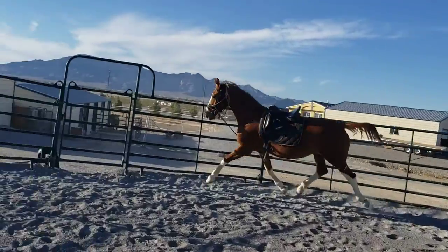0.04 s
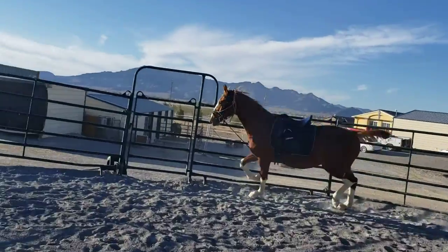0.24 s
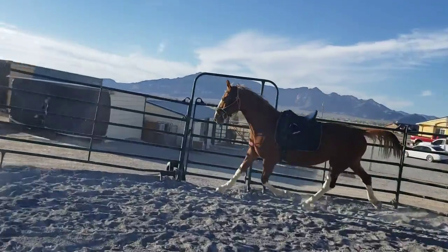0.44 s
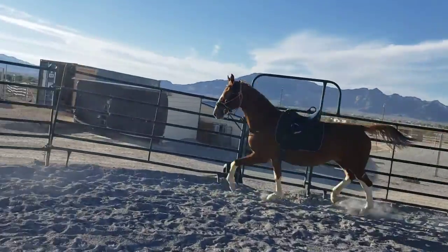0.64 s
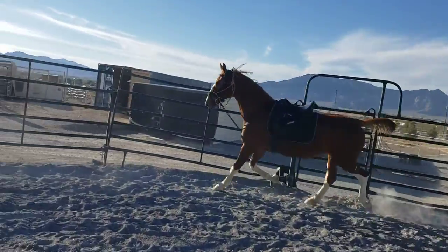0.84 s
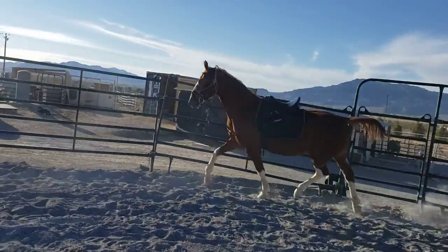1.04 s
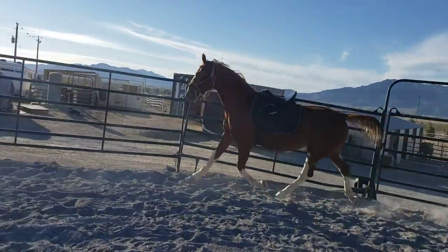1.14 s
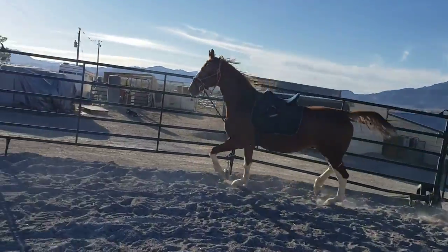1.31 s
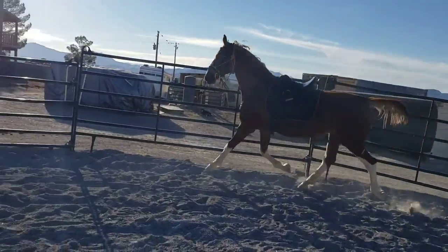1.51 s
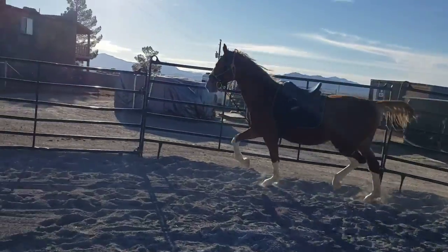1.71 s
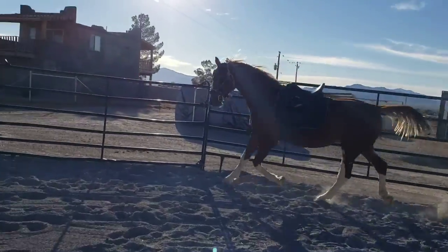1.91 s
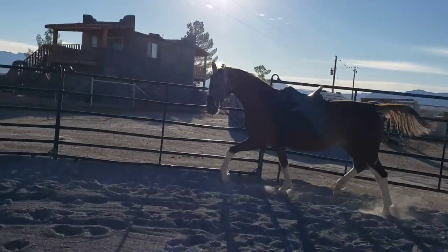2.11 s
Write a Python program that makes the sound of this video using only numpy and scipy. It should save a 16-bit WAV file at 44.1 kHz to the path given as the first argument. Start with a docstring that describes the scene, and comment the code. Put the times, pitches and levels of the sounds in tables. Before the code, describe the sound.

A trotting horse's muffled footfalls crunch and spray sand while low wind thumps the microphone

```python
"""A horse trots round a pen on deep sand, some metres from a phone held in a light breeze; about 2 s.
Air hiss and low wind run throughout: eddies thump on each of the two microphone ports separately.
Small dull knocks of hooves and saddle gear come at once, with footfalls crunching as coarse grains grind.
From 0.2 s a gust flutters on the left port as fine sand starts to spray, in ringing showers of grains.
Low thuds on firmer ground join from 0.6 s, and a buckle ticks once near 1.5 s."""
import sys
import numpy as np
from scipy import signal
from scipy.fft import rfft, irfft
from scipy.io import wavfile
from scipy.ndimage import uniform_filter1d

SR = 44100
rng = np.random.default_rng(int(sys.argv[2]) if len(sys.argv) > 2 else 0)


def voltage_ratio(decibels):
    """Convert decibels (scalar or array-like) to amplitude ratios, 20 dB per decade."""
    exponent = np.asarray(decibels, float) / 20
    return 10 ** exponent


def output_pcm(signal):
    """Save a mono or channel-first signal as 16-bit PCM at the path in sys.argv[1].

    Samples are clipped to [-1, 1] before scaling.
    """
    pcm = np.clip(np.atleast_2d(signal).T, -1, 1) * 32767
    wavfile.write(sys.argv[1], SR, np.round(pcm).astype(np.int16))


N = 94815
T = np.arange(N) / SR


def colour(x, table, scale=1):
    """Filters by a (freq_hz, gain_db) curve, straight in log frequency; scale multiplies the dB."""
    freq_hz, gain_db = np.array(table, float).T
    f = np.maximum(np.arange(N // 2 + 1) * SR / N, 1)
    curve_db = np.interp(np.log(f), np.log(freq_hz), gain_db)
    return irfft(rfft(x) * voltage_ratio(scale * curve_db), N)


def unit(x):
    """Scales to rms 1."""
    return x / np.sqrt(np.mean(x ** 2))


def walk(rate):
    """Random levels held 1 / rate seconds, slewed twice into a smooth wander."""
    hold = int(SR / rate)
    steps = np.repeat(rng.standard_normal(N // hold + 1), hold)
    return 1.36 * uniform_filter1d(uniform_filter1d(steps, hold), hold)[:N]


def sides(table):
    """Gains of left and right along a (time_s, left_minus_right_db) curve."""
    pan_db = np.interp(T, *np.array(table, float).T)
    return voltage_ratio(np.array([pan_db, -pan_db]) / 2)


def fall(t, t60):
    """Exponential decay after t = 0, losing 60 dB in t60 seconds."""
    return np.exp(-np.log(1000) * np.maximum(t, 0) / t60)


# Level of each port's own grains against the shared ones: freq_hz, gain_db
UNALIKE = [(500, -29), (1500, -1.5), (3000, 3.5), (15000, 11)]
BIGGEST = 4  # largest grain, in spreads


def grain_layer(table, rate, spread_db, cycles):
    """Random impulses of uneven size excite resonators from 250 Hz to 16 kHz, each with a Q of cycles."""
    f = np.arange(N // 2 + 1) * SR / N
    bands_hz = 250 * 2 ** np.arange(0, 6.2, 0.4)[:, None]
    shape = (len(bands_hz), N)
    size = voltage_ratio(spread_db * np.minimum(rng.exponential(1, shape), BIGGEST))
    # higher bands get more grains, in proportion to pitch
    chance = cycles * rate * bands_hz / 1000 / SR
    size = size * (rng.random(shape) < chance)
    ring = 1 / (1 + 1j * cycles * (f / bands_hz - bands_hz / (f + 1)))
    band_rms = np.sqrt(np.mean(size ** 2, axis=1, keepdims=True) + 1e-18)
    hits = rfft(size * rng.standard_normal(shape)) / band_rms
    return colour(irfft((hits * ring).sum(axis=0), N), table)


def grains(table, rate, spread_db, cycles):
    """Ringing grains shared by both ports, plus separate grains at each port that matter most in the treble."""
    shared = grain_layer(table, rate, spread_db, cycles)
    ports = [shared + colour(grain_layer(table, rate, spread_db, cycles), UNALIKE) for _ in range(2)]
    return unit(np.array(ports))


# Tone of the open air: freq_hz, gain_db
AIR_COLOUR = [(200, 16), (500, 6.5), (900, 3), (1500, -3), (2300, -5.5), (3500, -10), (7000, -15),
              (11000, -8), (15900, -13.5)]
# Loudness of the air before its random wander: time_s, level_db
AIR_LEVEL = [(0, -77.5), (.2, -76), (.5, -68), (.6, -76.5), (1.1, -68), (1.5, -69), (2.15, -64.5)]
# Lean of the air to the left, scaled separately for each side below: freq_hz, lean_db
AIR_LEAN = [(300, 6), (800, 2), (2400, 12), (5500, 22), (9000, 3.5), (15000, 0.5)]


def air():
    """Soft hiss of dense small grains, stronger on the left, most of all in the middle tones."""
    hiss = grains(AIR_COLOUR, rate=720, spread_db=2.5, cycles=2.6)
    left = colour(hiss[0], AIR_LEAN, scale=0.49)
    right = colour(hiss[1], AIR_LEAN, scale=-0.37)
    level_db = np.interp(T, *np.array(AIR_LEVEL).T)
    return np.array([left, right]) * voltage_ratio(level_db + 1.56 * walk(23.05))


# Eddies at the left port: peak_s, level_db, pitch_hz, width_s (between points 12 dB down)
EDDIES_LEFT = [(0.012, -39, 74.7, 0.061), (0.058, -41, 78, 0.026), (0.096, -32.5, 87.6, 0.05),
               (0.138, -38, 89, 0.013), (0.193, -29.5, 102, 0.027), (0.529, -32.5, 108, 0.0089),
               (0.55, -36, 97, 0.035), (0.571, -25, 118, 0.0048), (0.656, -28.5, 109, 0.021),
               (0.69, -49, 86, 0.023), (0.797, -42.5, 77, 0.0064), (0.847, -35, 93, 0.046),
               (0.899, -34, 142, 0.014), (0.965, -40.5, 116, 0.037), (1.035, -34.5, 86, 0.0061),
               (1.091, -35, 97, 0.0048), (1.17, -39, 67.5, 0.05), (1.206, -37.5, 72, 0.015),
               (1.27, -42.5, 109, 0.0072), (1.293, -30.5, 100, 0.018), (1.345, -34.5, 81, 0.03),
               (1.485, -45.5, 60.6, 0.021), (1.593, -40.5, 88, 0.0094), (1.626, -35, 82, 0.0072),
               (1.656, -46, 92, 0.013), (1.941, -35, 72.6, 0.046), (1.984, -29.5, 85, 0.018),
               (2.047, -40, 140, 0.019), (2.084, -52, 117, 0.016)]
# Eddies at the right port: peak_s, level_db, pitch_hz, width_s (between points 12 dB down)
EDDIES_RIGHT = [(0.212, -43, 75.6, 0.036), (0.257, -39, 103, 0.0079), (0.286, -31.5, 118, 0.0058),
                (0.333, -39, 84, 0.026), (0.419, -35.5, 72, 0.022), (0.468, -36.5, 79.8, 0.0056),
                (0.513, -35, 86, 0.018), (0.571, -31.5, 102, 0.012), (0.591, -40, 87.5, 0.0053),
                (0.628, -35.5, 116, 0.032), (0.657, -25, 78, 0.021), (0.692, -34, 112, 0.014),
                (0.845, -30.5, 99.5, 0.015), (0.899, -41, 107.4, 0.024), (0.948, -36.5, 99, 0.0076),
                (1.036, -39, 68.5, 0.027), (1.091, -37.5, 98, 0.031), (1.122, -36.5, 88, 0.0083),
                (1.166, -39.5, 59, 0.041), (1.225, -45.5, 62, 0.081), (1.271, -36, 102, 0.011),
                (1.295, -35, 125, 0.0091), (1.338, -32, 72.4, 0.029), (1.427, -41.5, 66, 0.014),
                (1.654, -43.5, 80, 0.037), (1.706, -38.5, 75, 0.011), (1.807, -43, 76, 0.023),
                (1.89, -40, 93, 0.046), (1.942, -30, 82.5, 0.0098), (1.981, -29.5, 69, 0.021),
                (2.025, -40.5, 114, 0.015), (2.084, -38.5, 94, 0.015)]


def eddies(port):
    """Each eddy is a short low swing under a bell-shaped envelope; returns swings and summed envelopes."""
    table = (EDDIES_LEFT, EDDIES_RIGHT)[port]
    swings, strength = np.zeros(N), np.zeros(N)
    for peak_s, level_db, pitch_hz, width_s in table:
        env = voltage_ratio(level_db) * np.exp(-((T - peak_s) / (0.42 * width_s)) ** 2)
        swings += env * np.cos(2 * np.pi * (pitch_hz * (T - peak_s) + rng.random()))
        strength += env
    return swings, strength


def low_noise(hz):
    """Noise gathered around one low frequency, at rms 1."""
    curve = [(hz / 5, -24), (hz / 2, -3), (hz, 0), (2 * hz, -16), (3 * hz, -33), (16 * hz, -100)]
    return unit(colour(rng.standard_normal(N), curve))


RUFFLE_DB, RUFFLE_HZ = -13, 175.7  # ragged edge, against eddy and gust strength
HEAVE_DB, HEAVE_HZ = -2.5, 55.2  # slower push, against eddy and gust strength
WAKE_DB, WAKE_S = -5.5, 0.061  # rumble around each eddy, against the smoothed eddy strength
LULL_DB, LULL_HZ = (-65, -62), 100.7  # rumble floor (left, right); pitch of floor and wake
LULL_FLICKER_DB = 3  # depth of the wander on wake and floor


def wind():
    """Turbulence at each port: eddy swings with ragged edges, a slow push and a rumbling wake; left gust."""
    out = np.zeros((2, N))
    for port in range(2):
        out[port], strength = eddies(port)
        k = int(WAKE_S * SR)
        smooth = uniform_filter1d(uniform_filter1d(strength, k), k)
        wake = voltage_ratio(WAKE_DB) * smooth + voltage_ratio(LULL_DB[port])
        if port == 0:
            flutter, gust_strength = gust()
            out[port] += flutter
            strength = strength + gust_strength
        out[port] += voltage_ratio(RUFFLE_DB) * strength * low_noise(RUFFLE_HZ)
        out[port] += voltage_ratio(HEAVE_DB) * strength * low_noise(HEAVE_HZ)
        out[port] += wake * voltage_ratio(LULL_FLICKER_DB * walk(29.96)) * low_noise(LULL_HZ)
    return out


def blow(peak_s, level_db, pitch_hz, rise_s, t60_s, turn):
    """One damped mode, pushed softly: a bell-shaped rise, then exponential decay; turn is phase in cycles."""
    t = T - peak_s
    env = np.exp(-(np.minimum(t, 0) / rise_s) ** 2) * fall(t, t60_s)
    return voltage_ratio(level_db) * env * np.sin(2 * np.pi * (pitch_hz * t + turn))


# Dull knocks of hooves and saddle gear: peak_s, level_db, pitch_hz (before detune)
KNOCKS = [(.011, -54, 705), (0.026, -46, 817), (.107, -61.5, 847), (.189, -50.5, 560), (.215, -55, 594),
          (0.255, -48.5, 744), (.287, -45.5, 1145), (.348, -55, 844), (.488, -53.5, 598), (.51, -52.5, 690),
          (0.614, -43, 727), (0.695, -49, 737), (0.71, -50, 842), (.795, -59, 780), (.962, -50, 620),
          (.988, -50, 710), (1.041, -51, 603), (1.421, -48.5, 752), (1.688, -60, 527), (1.709, -52, 770),
          (1.758, -58.5, 650), (2.034, -50, 782)]
# Modes of every knock: times_pitch (ratio), level_db (added to the knock's level)
KNOCK_MODES = [(1, -0.5), (1.55, -15), (2.2, -14.5)]
KNOCK_RISE_S, KNOCK_T60_S = 0.0021, 0.022
KNOCK_DETUNE = 0.15  # full random spread of each mode, as a fraction of its pitch


def knocks():
    """Soft blows each ring a few damped modes, randomly detuned."""
    out = np.zeros(N)
    for peak_s, level_db, pitch_hz in KNOCKS:
        for times_pitch, mode_db in KNOCK_MODES:
            turn, chance = rng.random(2)
            mode_hz = pitch_hz * times_pitch * (1 + KNOCK_DETUNE * (chance - 0.5))
            out += blow(peak_s, level_db + mode_db, mode_hz, KNOCK_RISE_S, KNOCK_T60_S, turn)
    return out


# Hoof sinking into sand: start_s, rise_s, fall_t60_s, level_db (at the peak)
CRUNCH = [(0.014, 0.0092, 0.11, -64.5), (0.1, 0.046, 0.16, -69), (0.236, 0.054, 0.082, -50),
          (.292, 0.015, 0.088, -53.5), (.32, 0.029, 0.37, -62), (0.472, 0.011, 0.28, -68),
          (0.566, 0.046, 0.45, -55), (0.785, 0.022, 0.15, -66.5), (0.936, 0.025, 0.3, -55.5),
          (1.15, 0.03, 0.11, -65.5), (1.276, 0.043, 0.27, -56), (1.405, 0.0065, 0.11, -63),
          (1.628, 0.018, 0.46, -62.5), (1.675, 0.033, 0.14, -59), (1.751, 0.0079, 0.075, -68.5),
          (1.992, 0.023, 0.5, -56)]
# Tone of the coarse grains: freq_hz, gain_db
CRUNCH_COLOUR = [(250, 7.5), (450, 0.5), (800, -1.5), (1400, -4), (1900, -8.5), (2400, -7), (3200, -15),
                 (4500, -17.5), (7000, -29.5), (12000, -61)]
# Place of the crunches: time_s, left_minus_right_db
CRUNCH_PAN = [(.3, 6.5), (.6, 2), (2.1, 2)]


def crunch():
    """Coarse grains grind as the hoof sinks: each swells, then dies away, with a fast flicker in level."""
    env = np.zeros(N)
    for start_s, rise_s, t60_s, level_db in CRUNCH:
        t = T - start_s
        env += voltage_ratio(level_db) * np.clip(t / rise_s, 0, 1) ** 0.8 * fall(t - rise_s, t60_s)
    flicker = voltage_ratio(2.7 * walk(120))
    sand = grains(CRUNCH_COLOUR, rate=140, spread_db=1.0, cycles=4.1)
    return env * sides(CRUNCH_PAN) * flicker * sand


# Flutter on the left port, before its random wander: time_s, level_db, pitch_hz
GUST = [(0.221, -38.5, 69.97), (0.252, -23.5, 78.9), (0.28, -16, 92), (0.303, -19, 84.9),
        (0.334, -15.5, 60), (0.359, -21.5, 69.9), (0.391, -16, 84.7), (0.411, -29, 97.5), (0.44, -70, 71.4)]
GUST_WANDER = 0.244  # pitch wander, as a fraction of the pitch
GUST_SECOND_DB = -13.5  # second harmonic


def gust():
    """A low tone and its octave wander in pitch and level; returns the flutter and its envelope."""
    time_s, level_db, pitch_hz = np.array(GUST).T
    wander_db = 2.0 * walk(57.9)
    env = uniform_filter1d(voltage_ratio(np.interp(T, time_s, level_db, -120, -120) + wander_db), 200)
    hz = np.interp(T, time_s, pitch_hz) * (1 + GUST_WANDER * walk(50.2))
    phase = 2 * np.pi * np.cumsum(hz) / SR
    return env * (np.sin(phase) + voltage_ratio(GUST_SECOND_DB) * np.sin(2 * phase)), env


# Thrown sand: start_s, hold_s (from the start), fall_t60_s, level_db
SPRAY = [(0.235, 0.025, 0.05, -63.5), (0.254, 0.028, 0.16, -58.5), (0.473, 0.01, 0.054, -62.5),
         (0.568, 0.056, 0.064, -60.5), (0.637, 0.016, 0.041, -50.5), (0.668, 0.0046, 0.043, -44),
         (0.695, 0.15, 0.65, -60), (0.924, 0.07, 0.33, -63.5), (1.047, .002, 0.025, -59),
         (1.15, 0.04, 0.25, -65), (1.283, 0.011, 0.044, -55.5), (1.312, 0.0053, 0.23, -58),
         (1.636, 0.013, 0.35, -58.5), (1.868, 0.014, .1, -64.5), (1.962, 0.0018, 0.013, -56),
         (1.99, 0.047, 0.092, -58.5), (2.118, 0.0032, 0.026, -53.5), (2.129, 0.0033, 0.023, -57)]
# Tone of the fine grains: freq_hz, gain_db
SPRAY_COLOUR = [(1200, -29), (2500, -16.5), (4200, -1.5), (6000, -2.5), (8000, -6.5), (10500, -1.5),
                (13000, -4), (16000, -11)]
# Place of the sprays: time_s, left_minus_right_db
SPRAY_PAN = [(.3, 2.5), (.65, -0.5)]


def spray():
    """Fine sand flies up at once, patters on and dies away, in bright grains of very uneven size."""
    env = np.zeros(N)
    for start_s, hold_s, t60_s, level_db in SPRAY:
        t = T - start_s
        env += voltage_ratio(level_db) * np.clip(t / 0.00097, 0, 1) * fall(t - hold_s, t60_s)
    flicker = voltage_ratio(1.3 * walk(90))
    sand = grains(SPRAY_COLOUR, rate=140, spread_db=3.5, cycles=2.5)
    return env * sides(SPRAY_PAN) * flicker * sand


# Hoof meets firmer ground: peak_s, level_db, pitch_hz
THUDS = [(.614, -34.5, 276), (.645, -42, 254), (.943, -49.5, 290), (1.04, -55.5, 330), (1.419, -49, 395),
         (2.034, -48, 330)]


def thuds():
    """Each thud rings one low damped mode."""
    out = np.zeros(N)
    for peak_s, level_db, pitch_hz in THUDS:
        out += blow(peak_s, level_db, pitch_hz, rise_s=0.0036, t60_s=0.03, turn=rng.random())
    return out


# A buckle: start_s, level_db, pitch_hz
TICKS = [(1.4758, -52, 3770)]


def buckle():
    """A sine that starts at once and decays in a few milliseconds makes a small tick."""
    out = np.zeros(N)
    for start_s, level_db, pitch_hz in TICKS:
        t = T - start_s
        out += voltage_ratio(level_db) * (t > 0) * fall(t, 0.013) * np.sin(2 * np.pi * pitch_hz * t)
    return out


# Difference in tone between the two ports: freq_hz, left_minus_right_db
PORTS = [(500, -3.5), (2400, 4), (5500, 4.5), (9000, 2), (14000, 0.5)]
LAG_S = 0.00012  # the left port hears later
KNOCK_PAN_DB = 4.5  # left minus right, for knocks, thuds and buckle


def scene():
    """Horse and air reach the left port a little late; wind is made at the ports."""
    hiss = air()
    breeze = wind()
    blows = (knocks() + thuds() + buckle()) * sides([(0, KNOCK_PAN_DB)])
    horse = blows + crunch() + spray()
    far = hiss + np.array([colour(horse[0], PORTS, scale=0.5), colour(horse[1], PORTS, scale=-0.5)])
    f = np.arange(N // 2 + 1) * SR / N
    far[0] = irfft(rfft(far[0]) * np.exp(-2j * np.pi * f * LAG_S), N)
    return far + breeze


def roll_off(x):
    """The treble ends steeply here."""
    return signal.sosfilt(signal.butter(12, 16010, fs=SR, output="sos"), x)


def record(dry):
    """The microphones lose the deepest bass through a steep high-pass at 46 Hz."""
    bass_cut = signal.butter(4, 46, "high", fs=SR, output="sos")
    mix = signal.sosfilt(bass_cut, dry)
    return roll_off(mix)


dry = scene()
out = record(dry)
output_pcm(out)
```